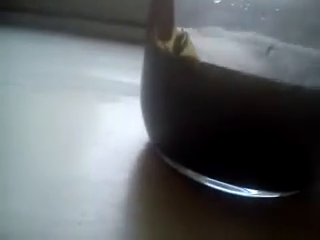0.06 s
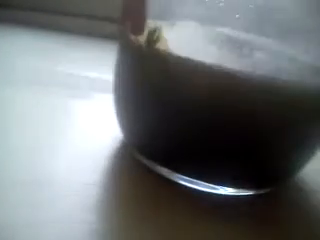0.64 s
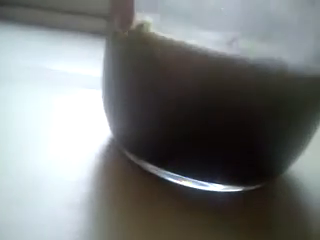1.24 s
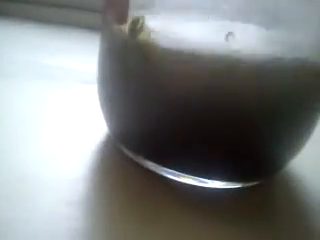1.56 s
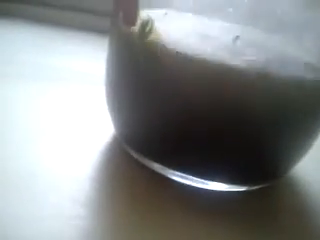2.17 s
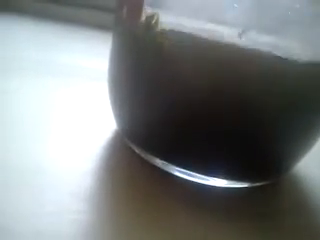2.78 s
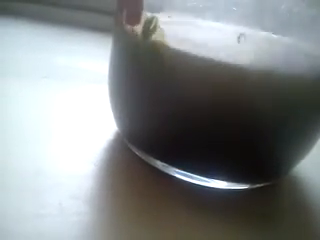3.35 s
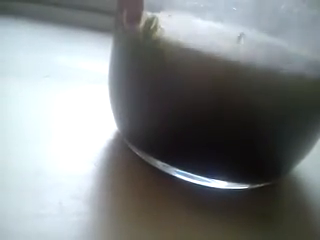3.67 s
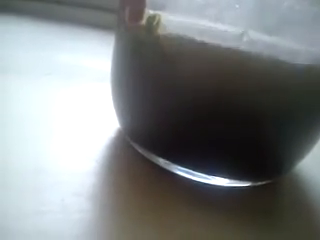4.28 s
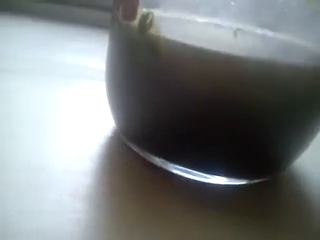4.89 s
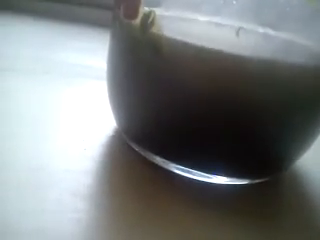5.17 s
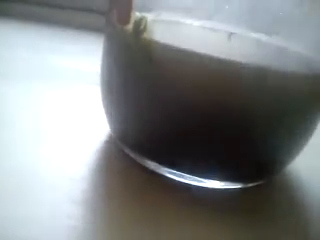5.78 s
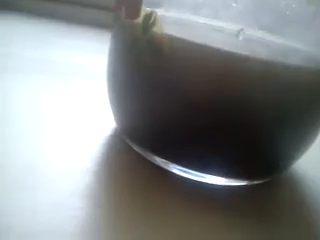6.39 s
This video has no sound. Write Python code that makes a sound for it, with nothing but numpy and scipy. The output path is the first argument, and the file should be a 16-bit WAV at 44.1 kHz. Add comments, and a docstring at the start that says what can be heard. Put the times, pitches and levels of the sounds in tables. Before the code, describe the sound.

A metal spoon stirs tea in a glass jug near the microphone, touching the sides in small, uneven clinks. A few tiny ticks follow, then three sharp, quick taps on the rim leave a clear, wavering ring. There is a soft rub of a hand before the spoon lands on the table and rattles to rest. The small room is quiet apart from a very faint appliance hum.

```python
"""A spoon stirs tea in a glass jug on a table close by, each touch exciting the modes of the wall.
Three taps on the rim follow; after the second, little damps the glass and it rings out.
A hand shuffles with friction noise, then the spoon is put down and clatters in inelastic bounces.
A faint appliance hum fills the small room."""
import sys
import numpy as np
from scipy import signal
from scipy.fft import irfft
from scipy.io import wavfile
from scipy.ndimage import uniform_filter1d

SR = 44100
rng = np.random.default_rng(int(sys.argv[2]) if len(sys.argv) > 2 else 0)


def unload_wav(signal):
    """Save mono or channel-first audio to the path in sys.argv[1] as 16-bit WAV at rate SR, clipped to [-1, 1]."""
    wavfile.write(
        sys.argv[1],
        SR,
        np.round(np.clip(np.atleast_2d(signal).T, -1, 1) * 32767).astype(np.int16),
    )


N = 283563
TIME = np.arange(N) / SR


def amp(db):
    """The decibel scale: 20 dB is a factor of ten in amplitude."""
    return 10 ** (np.asarray(db) / 20)


def unit(x):
    """Normalisation to rms 1."""
    return x / np.sqrt(np.mean(x ** 2) + 1e-20)


def decay(t, t60):
    """Exponential damping: the amplitude falls 60 dB in t60 seconds."""
    return np.exp(-np.log(1000) * t / t60)


def curve_at(points, hz):
    """Interpolation on a logarithmic frequency axis."""
    f, value = np.transpose(points)
    return np.interp(np.log(hz + 1), np.log(f + 1), value)


def add(mix, s, sound):
    """Superposition: a sound joins the mix at s seconds."""
    part = mix[max(round(s * SR), 0):][:len(sound)]
    part += sound[:len(part)]


def noise(spectrum, size, tilt=0):
    """Random-phase noise of rms 1, its spectrum tilted in dB per octave above about 1 kHz."""
    hz = np.fft.rfftfreq(size, 1 / SR)
    gain = amp(curve_at(spectrum, hz) + tilt * np.log2(1 + hz / 1000))
    return unit(irfft(gain * np.exp(2j * np.pi * rng.random(len(hz))), size))


def burst(spectrum, t60, tilt=0):
    """An impact transient: coloured noise with a sudden onset and exponential decay."""
    t = TIME[:SR // 3]
    puff = noise(spectrum, len(t), tilt) * decay(t, t60)
    return np.pad(puff, (0, SR - len(t)))


def ring(modes, scatter_db):
    """Free vibration: damped sines of alternating sign, their strengths set by the point of contact."""
    out = np.zeros(SR)
    for k, (hz, db, t60) in enumerate(modes):
        t = TIME[:min(int(2 * t60 * SR), SR)]
        strength = (-1) ** k * amp(db + scatter_db * rng.standard_normal())
        out[:len(t)] += strength * np.sin(2 * np.pi * hz * t) * decay(t, t60)
    return out


def rebounds(s, gap_s, restitution):
    """Inelastic bouncing: times of a landing and three rebounds, the gaps shrinking geometrically."""
    return s + gap_s * np.append(0, np.cumsum(restitution ** np.arange(3)))


# reverberation of the room: (frequency [Hz], t60 [s])
ROOM_DECAY = [(100, 0.13), (1000, 0.42), (4000, 0.21), (8000, 0.2), (11500, 0.12), (15000, 0.26)]

def room(x, delay_s=0.003):
    """Reverberation: convolution with a diffuse tail that lasts longest in the midrange."""
    hz, t, spectra = signal.stft(rng.standard_normal(SR // 2), SR, nperseg=256)
    spectra *= decay(t, curve_at(ROOM_DECAY, hz)[:, None])
    _, tail = signal.istft(spectra, SR, nperseg=256)
    tail = np.pad(tail / np.linalg.norm(tail), (round(delay_s * SR), 0))
    return signal.fftconvolve(x, tail)[:N]


# still air: (frequency [Hz], relative density [dB])
AIR_SPECTRUM = [(12, -34.5), (20, -9.5), (27, -13.5), (146, -14), (248, -20.5), (277, -17.5), (410, -21.5),
                (607, -19), (678, -22.5), (1030, -26.5), (1400, -28), (2390, -30.5), (4180, -33.5),
                (6010, -32), (16000, -39)]
# tones of the appliance: (frequency [Hz], rms level [dB])
HUM_TONES = [(100, -81), (149, -81.5), (279.9, -85), (441.4, -89), (602.9, -78.5)]

def background():
    """A noise floor of still air, and an appliance hum wavering by a random walk of phase."""
    out = amp(-71) * noise(AIR_SPECTRUM, N)
    for hz, db in HUM_TONES:
        waver = 0.015 * np.cumsum(rng.standard_normal(N))
        out += amp(db) * np.sqrt(2) * np.sin(2 * np.pi * hz * TIME + waver)
    return out


# thudding, rubbing and sliding of skin: (frequency [Hz], relative density [dB])
THUD_SPECTRUM = [(30, -7), (90, 4.5), (160, -13), (210, 0.5), (400, -21), (1000, -57)]
RUB_SPECTRUM = [(120, -28), (250, -8), (330, 1.5), (430, 12.5), (560, -1.5), (900, -1.5), (1500, -6),
                (3000, -13), (8000, -40)]
SLIDE_SPECTRUM = [(1200, -32), (3000, -9), (8500, 0), (11000, -13), (16000, -25)]
# strokes of the hand: (midpoint [s], duration [s], weight [dB], hiss level [dB])
HAND_STROKES = [(4.18, .26, -59, -69.5), (4.298, 0.19, -54.5, -73.5), (4.407, 0.17, -59.5, -80.5),
                (4.54, 0.14, -64.5, -68.5), (5.38, 1, -81, -77), (6.222, .28, -64, -67)]

def hand(catch_db=2.5, catch_s=0.016):
    """Stick-slip friction: the skin's uneven grip modulates the thud, rub and hiss of each stroke."""
    out = np.zeros(N)
    pole = np.exp(-1 / (catch_s * SR))
    catching = unit(signal.lfilter([1], [1, -pole], rng.standard_normal(N)))
    grip = unit(amp(catch_db * catching))
    body = amp(-1.5) * noise(THUD_SPECTRUM, N) + amp(-3.5) * noise(RUB_SPECTRUM, N)
    hiss = noise(SLIDE_SPECTRUM, N)
    for s, duration, weight_db, hiss_db in HAND_STROKES:
        swell = np.cos(np.pi * np.clip((TIME - s) / duration, -0.5, 0.5)) ** 2
        out += swell * (amp(weight_db) * body + amp(hiss_db) * hiss)
    return out * grip


# ticks of liquid and fingers: (time [s], relative level [dB], centre frequency [Hz])
SOFT_TICKS = [(.284, -52, 2970), (1.378, -50, 3800), (1.825, -56, 3300), (1.8485, -57.5, 4030),
              (2.0933, -60, 4100), (2.79, -59.5, 4050), (3.235, -53.5, 3990), (3.279, -56.5, 4346),
              (4.368, -53.5, 7470), (4.425, -55.5, 6800), (4.981, -60, 3120)]

def ticks(half_width_octaves=0.27):
    """Band-limited transients: each soft tick is noise around its own centre frequency."""
    out, hz = np.zeros(N), np.geomspace(100, SR / 2, num=40)
    for s, db, centre_hz in SOFT_TICKS:
        band_db = -10 * np.log10(1 + (np.log2(hz / centre_hz) / half_width_octaves) ** 4)
        add(out, s, amp(db - 7) * burst(np.c_[hz, band_db], t60=0.087))
    return out


# scuffing rattle and boom of the table top: (frequency [Hz], relative density [dB])
SCUFF_SPECTRUM = [(29, -35), (50, -6), (208, 0), (298, -38), (380, 0), (495, -12.5), (1050, -8.5),
                  (1330, -11), (2810, -11.5), (7570, -20.5), (16000, -39)]
BOOM_SPECTRUM = [(50, -6), (100, -6), (150, -3.5), (220, -6), (430, -6), (550, -15.5), (1200, -24.5),
                 (4000, -74)]
# bumps: (time [s], relative rattle level [dB], relative boom level [dB], first rebound gap [s])
TABLE_BUMPS = [(.001, -52.5, -51.5, .01), (0.1564, -32, -47, .044)]

def bumps():
    """Impact excitation of a plate: something rocks to rest and leaves the table top booming."""
    out = np.zeros(N)
    for s, rattle_db, boom_db, gap_s in TABLE_BUMPS:
        for k, at in enumerate(rebounds(s, gap_s, restitution=0.9)):
            add(out, at, amp(rattle_db - 10 - 7.5 * k) * burst(SCUFF_SPECTRUM, t60=0.16))
            add(out, at, amp(boom_db - 7 - 4 * k) * burst(BOOM_SPECTRUM, t60=0.67))
    return out


# modes of the spoon: (frequency [Hz]) and (relative level [dB], t60 [s])
SPOON_MODE_HZ = [1060, 5100, 5440, 6390, 6610, 7640, 8260, 8420, 9350, 11100, 12480, 13500, 15110]
SPOON_MODES = [(-4.5, 0.04), (-2.5, 0.047), (2.5, 0.044), (-14, 0.12), (0.5, 0.16), (-2, 0.13),
               (-2.5, 0.15), (-7, 0.22), (-5, 0.16), (-11.5, 0.38), (-19, .2), (-20, 0.24), (-16, 0.21)]
# contact noise of a landing: (frequency [Hz], relative density [dB])
LANDING_SPECTRUM = [(88, -44.5), (150, -28), (675, -14.5), (1060, -4.5), (1360, -16.5), (1500, -9),
                    (2270, -13.5), (2600, -11), (3160, -12), (4760, -4), (5250, -3.5), (8230, -1.5),
                    (16000, -24.5)]
# its ends land in turn: (time [s], relative level [dB], tilt [dB/octave], first rebound gap [s])
SPOON_LANDINGS = [(5.5877, -36, -3.5, .015), (5.6578, -25.5, -1.5, .023), (5.7379, -44, -9.5, 0.0033),
                  (5.7984, -32, -3, .003), (5.9616, -18.5, 1.5, .01), (5.995, -28.5, -1.5, 0.0011),
                  (6.0225, -25.5, 0, .02), (6.1, -37, -2.5, .007)]

def clatter(bounce_loss_db=7):
    """Inelastic collisions: the spoon settles in chattering cracks, each with a thin metal ring."""
    cracks, metal = np.zeros((2, N))
    modes = np.c_[SPOON_MODE_HZ, SPOON_MODES]
    for s, landing_db, tilt, gap_s in SPOON_LANDINGS:
        for k, at in enumerate(rebounds(s, gap_s, restitution=0.68)):
            db = landing_db - k * bounce_loss_db
            add(cracks, at, amp(db - 12.5) * burst(LANDING_SPECTRUM, t60=0.037, tilt=tilt))
            add(cracks, at, amp(db - 13) * burst(LANDING_SPECTRUM, t60=0.081, tilt=tilt))
            add(metal, at, amp(db - 25) * ring(modes, scatter_db=2.5))
    chatter_db = 2.86 * unit(uniform_filter1d(rng.standard_normal(N), size=60))
    return cracks * unit(amp(chatter_db)) + metal


# low and high modes of a submerged knock: (frequency [Hz], relative level [dB], nominal t60 [s])
DULL_MODES = [(665, -13, 0.025), (1061, -2, 0.053), (1177, -10, 0.034)]
PING_MODES = [(3125, 2.5, 0.036), (3300, -15, 0.047), (3380, -17.5, 0.03)]
# its contact noise: (frequency [Hz], relative density [dB])
KNOCK_SPECTRUM = [(60, 5), (150, 1), (600, 11), (1100, 5), (2000, -1.5), (3300, -1), (5000, -3.5),
                  (9000, -51), (16000, -23)]

def knock(db, ping_db):
    """Heavily damped modes: a dull knock and a ping whose pitch shifts with the place of contact."""
    dull = ring(DULL_MODES, scatter_db=2) + amp(-4.5) * burst(KNOCK_SPECTRUM, t60=0.053)
    shift = 1 + 0.014 * rng.standard_normal()
    modes = [(hz * shift, mode_db, 1.02 * t60) for hz, mode_db, t60 in PING_MODES]
    return amp(db) * (dull + amp(ping_db - 2.5) * ring(modes, scatter_db=1.5))


# bright modes of spoon and jug together: (frequency [Hz]) and
# (relative level in a tap [dB], relative level in stirring [dB], nominal t60 [s])
BRIGHT_MODE_HZ = [6172, 6358, 6820, 7265, 7562, 7760, 8600, 9402, 10180, 11130, 11880, 12181, 13030, 13565,
                  14950, 15450]
BRIGHT_MODES = [(-23, -5.5, 0.21), (-3, -0.5, .1), (-22.5, -3, 0.048), (1, -3.5, 0.09), (-9.5, -24, 0.055),
                (-5.5, 1.5, 0.1), (-12.5, -13, 0.041), (-3, -8, 0.077), (-24.5, -7.5, 0.1),
                (-26.5, -26, 0.076), (-15.5, 9, 0.1), (-9, -15, 0.096), (-25.5, -24, 0.078),
                (-21, -1, 0.067), (-30.5, 6, .05), (-24.5, -38, .05)]
# contact noise of metal on glass, and force of a stirring touch: (frequency [Hz], relative level [dB])
CRACK_SPECTRUM = [(60, -31.5), (450, -4.5), (1000, -9), (1800, -29.5), (3000, -9), (4800, 3.5), (8000, -3),
                  (12000, -1), (16000, -15.5)]
TOUCH_SPECTRUM = [(2500, -59), (6400, -1), (7400, -3), (10200, 5.5), (11600, -15)]

def clink(db, tilt):
    """The force spectrum weights a tick and the bright modes: a harder touch reaches higher."""
    def force_db(hz):
        return curve_at(TOUCH_SPECTRUM, hz) + tilt * np.log2(max(hz, 4000) / 8000)

    modes = [(hz, mode_db + force_db(hz), 0.79 * t60)
             for hz, (_, mode_db, t60) in zip(BRIGHT_MODE_HZ, BRIGHT_MODES)]
    tick = burst([(hz, crack_db + force_db(hz)) for hz, crack_db in CRACK_SPECTRUM], t60=0.046)
    return amp(db - 8.5) * ring(modes, scatter_db=6.5) + amp(db - 4.5) * tick


# modes of the jug's wall: (frequency [Hz]) and
# (relative level [dB], nominal t60 [s], sensitivity to the spoon's damping [ratio])
WALL_MODE_HZ = [1067.4, 2379, 3969.5, 6002, 8538, 11494, 14720]
WALL_MODES = [(-19, 1.36, 0.33), (-16, 1.2, 1.4), (-1, 0.63, 1.8), (-4.5, .27, 0.64), (1.5, 0.12, 0.33),
              (-11.5, 0.091, .6), (-28.5, .1, .3)]
# the spoon's stem on the wall: (time [s], relative level [dB], hardness as tilt [dB/octave])
STEM_CLINKS = [(0.1186, -51, 4), (0.1867, -46.5, -3), (0.5017, -53.5, -4), (0.5753, -49, -2),
               (0.7547, -45, 4), (0.9047, -51.5, 9), (1.103, -54.5, -15), (1.1417, -51, -6),
               (1.285, -36, 4.5), (1.416, -43, 4), (1.55, -37, 1.5), (1.7, -51.5, 8), (1.7581, -55.5, 7)]
# its bowl below the surface: (time [s], relative level [dB], ping offset [dB])
BOWL_KNOCKS = [(0.0154, -52, -5), (0.52, -51.5, -14), (0.77, -50.5, -11), (.822, -54.5, -1),
               (1.0048, -54, 7), (1.2915, -42.5, -3.5), (1.3495, -47.5, -8), (1.5806, -50.5, -1),
               (1.773, -44, 6)]

def stirring(wall_db=-18):
    """Resonant energy storage: each touch clinks and knocks, and the knocks keep the wall singing."""
    clinks, knocks, energy = np.zeros((3, N))
    energy_decay = decay(TIME[:2 * SR], t60=WALL_MODES[0][1]) ** 2
    # the stem's knock grows more slowly than its clink; the bowl's clink is soft and dull
    touches = [(s, db, tilt, 0.37 * db - 36.5, -13.5) for s, db, tilt in STEM_CLINKS]
    touches += [(s, db - 5.5, -6.5, db, ping_db) for s, db, ping_db in BOWL_KNOCKS]
    for s, clink_db, tilt, knock_db, ping_db in touches:
        add(clinks, s, clink(clink_db, tilt))
        add(knocks, s, knock(knock_db, ping_db))
        add(energy, s, amp(knock_db + wall_db) ** 2 * energy_decay)
    lowest, second = (np.sin(2 * np.pi * hz * TIME) for hz in WALL_MODE_HZ[:2])
    return clinks, knocks + np.sqrt(energy) * (lowest + amp(-13.5) * second)


def beating(t, onset_s, beat_hz=3.67, fade_s=0.27, first_dip_s=0.092):
    """Interference: a mode swells and dips against a slightly detuned twin that dies sooner."""
    age = np.maximum(t - onset_s, 0)
    twin = 1.3 * np.exp(-age / fade_s) * (age > 0)
    return abs(1 - twin * np.exp(2j * np.pi * beat_hz * (age - first_dip_s)))


# three taps, each followed by its rebound: (time [s], wall level [dB], bright level [dB],
# crack level [dB], tilt [dB/octave], damping by the resting spoon [dB])
RIM_CONTACTS = [(3.1558, -18, -17, -20.5, 2, 1), (3.1651, -26.5, -14.5, -23, 6, 30.5),
                (3.3343, -10.5, -10.5, -17.5, 3.5, 4), (3.3510, -34.5, -15, -16, -2.5, 1.5),
                (3.499, -22, -19.5, -21, 7, 10), (3.5132, -32.5, -17.5, -24.5, 13.5, 3)]

def rim_taps(contact_s=0.024, rise_s=0.0004):
    """Impulse response with contact damping: each blow feeds the modes, the resting spoon drains them."""
    start = round((RIM_CONTACTS[0][0] - 0.01) * SR)
    t = TIME[start:start + 2 * SR]
    drained_db = sum(loss_db * np.clip((t - s) / contact_s, 0, 1) for s, *_, loss_db in RIM_CONTACTS)
    wall, contact = np.zeros((2, N))

    def swing(s, t60, sensitivity):
        """Modal envelope of a blow at time s, which feels only the damping that comes after it."""
        age = np.maximum(t - s, 0)
        damping = amp(sensitivity * (np.interp(s, t, drained_db) - drained_db))
        return np.minimum(age / rise_s, 1) * decay(age, t60) * damping

    for hz, (db, t60, sensitivity) in zip(WALL_MODE_HZ, WALL_MODES):
        t60 = t60 / (1 + (hz / 14000) ** 4)  # the liquid absorbs the wall's finest ripples
        envelope = sum(amp(wall_db + tilt * np.log2(hz / 4000)) * swing(s, t60, sensitivity)
                       for s, wall_db, _, _, tilt, _ in RIM_CONTACTS)
        if hz == WALL_MODE_HZ[0]:  # the last tap excites the lowest mode's twin
            envelope *= beating(t, onset_s=RIM_CONTACTS[-2][0])
        add(wall, t[0], amp(db) * envelope * np.sin(2 * np.pi * (hz * t + rng.random())))
    for hz, (db, _, t60) in zip(BRIGHT_MODE_HZ, BRIGHT_MODES):
        envelope = sum(amp(bright_db + rng.normal(0, 1.8)) * swing(s, 0.88 * t60, sensitivity=0.52)
                       for s, _, bright_db, *_ in RIM_CONTACTS)
        add(contact, t[0], amp(db) * envelope * np.sin(2 * np.pi * (hz * t + rng.random())))
    for s, _, _, crack_db, _, _ in RIM_CONTACTS:
        add(contact, s, amp(crack_db) * burst(CRACK_SPECTRUM, t60=0.032))
    return wall, contact


def scene():
    """Direct-to-reverberant ratio conveys distance: the jug is near, the spoon lands farther off."""
    wall, taps = rim_taps()
    clinks, knocks = stirring()
    near = clinks + bumps() + ticks()
    far = clatter()
    reverb = room(amp(-18) * wall + amp(-24) * taps + amp(-13.5) * near
                  + amp(-15) * knocks + amp(-9.5) * far)
    return (wall + taps + near + knocks + far + reverb + hand() + background())[None]


def record(dry, ceiling=0.69, cutoff_hz=15900):
    """Soft saturation: the hardest tap overloads the microphone; a low-pass then limits the band."""
    saturated = dry / (1 + (dry / ceiling) ** 6) ** (1 / 6)
    low_pass = signal.firwin(255, cutoff_hz, window=("kaiser", 8), fs=SR)
    return signal.oaconvolve(saturated, low_pass[None], "same")


dry = scene()
out = record(dry)
unload_wav(out)
```